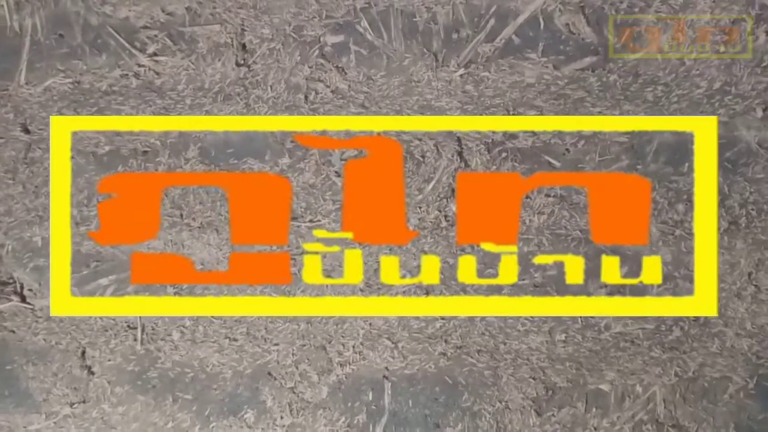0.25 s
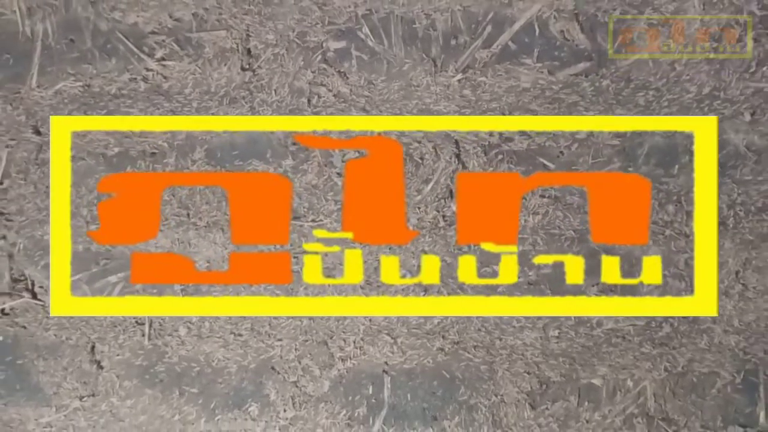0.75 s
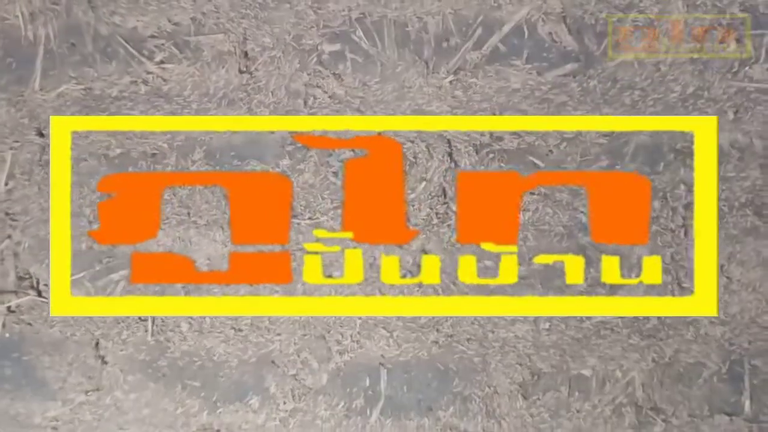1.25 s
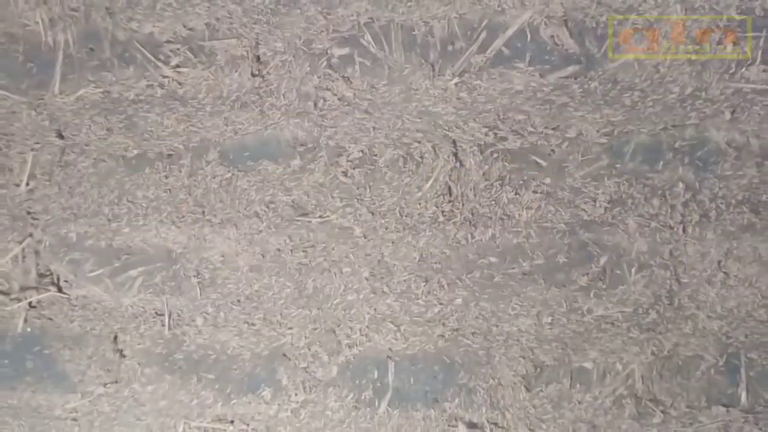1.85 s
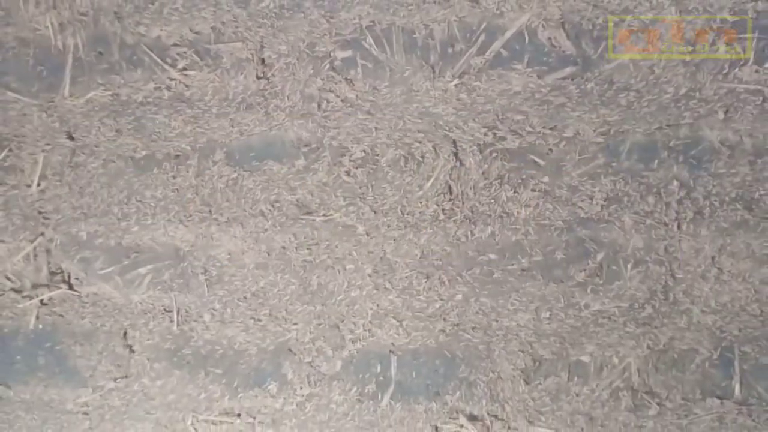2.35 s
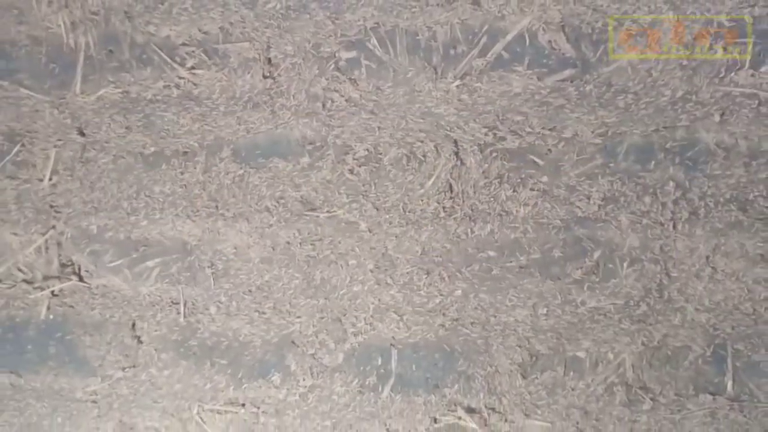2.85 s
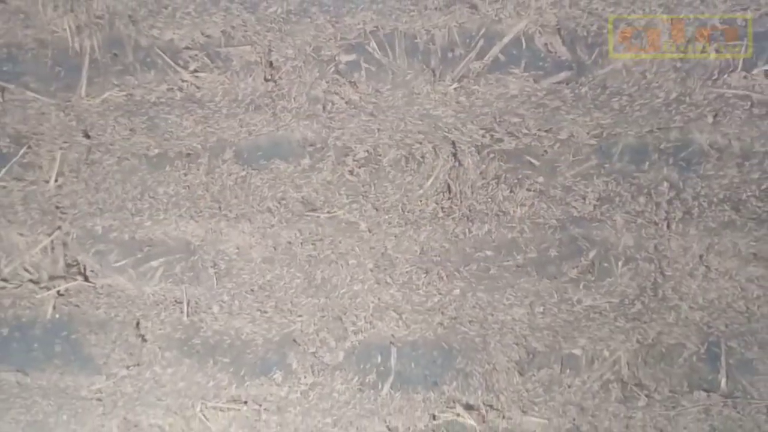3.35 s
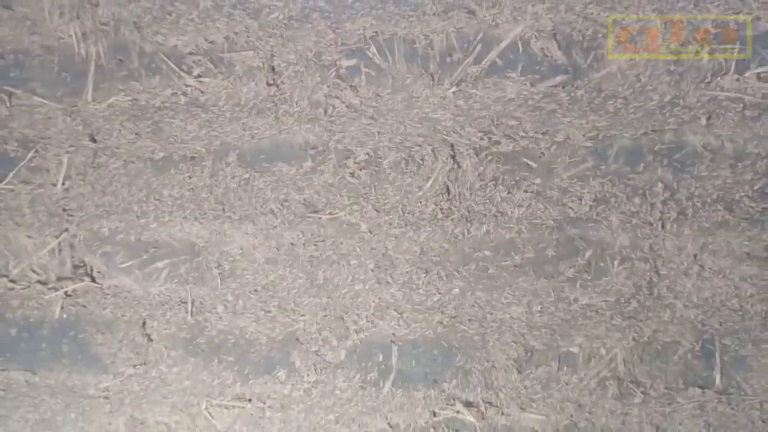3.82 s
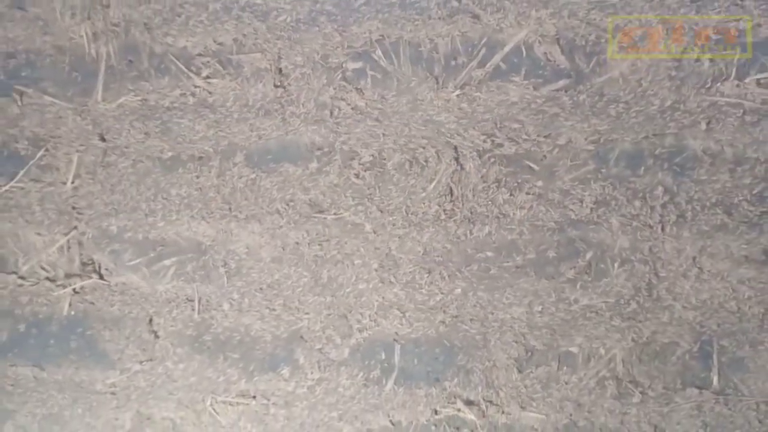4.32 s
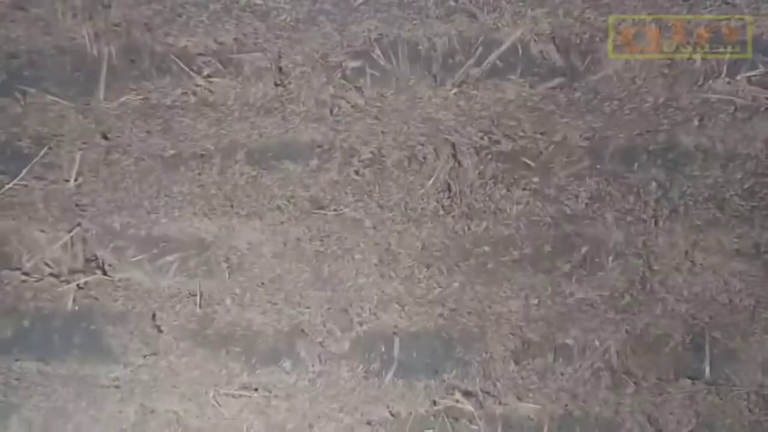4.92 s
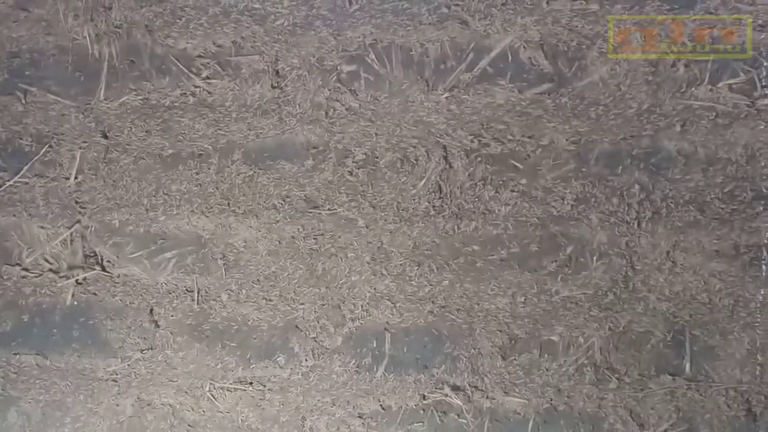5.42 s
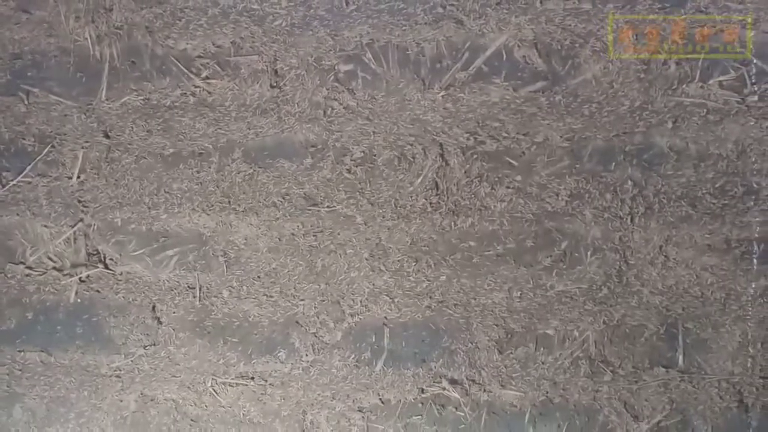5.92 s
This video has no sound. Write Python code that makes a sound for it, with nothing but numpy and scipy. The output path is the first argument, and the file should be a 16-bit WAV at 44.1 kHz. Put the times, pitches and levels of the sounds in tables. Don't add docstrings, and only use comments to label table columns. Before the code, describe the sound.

A quiet rice field with soft air noise, low far rumble and steady high insect buzz. From 0.13 s a close frog gives short, bright, nasal notes, each a tiny burst of fast pulses, about every quarter second, with a slightly longer gap before 1.03 s. A deeper neighbour overlaps or just precedes the first three, then sounds alone at 0.88 s. The near notes edge upward in pitch and end at 2.65 s. The background lifts around each loud note and ducks between. Fainter low frogs follow; from 3.4 to 5.5 s a farther frog repeats evenly, with another answering between its notes to about 6 s. Dry ten-click toad rattles recur roughly every 0.7 s. Thin high bird whistles fall at 1.9, 3.3 and 4.6 s. Crickets chirp early and again after 3.2 s, above a murmuring distant frog chorus, a faint coo near 1 s and a soft hum from 3 to 4.7 s.

```python
import sys
import numpy as np
from scipy import signal
from scipy.fft import rfft, irfft
from scipy.io import wavfile
from scipy.ndimage import uniform_filter1d

SR = 44100
rng = np.random.default_rng(int(sys.argv[2]) if len(sys.argv) > 2 else 0)


def amplitude_ratio(level_db):
    exponent = np.asarray(level_db, float) / 20
    return 10 ** exponent


def put_to_file(sound):
    columns = np.atleast_2d(sound).T
    safe = np.clip(columns, -1, 1)
    whole_steps = np.round(safe * 32767)
    wavfile.write(sys.argv[1], SR, whole_steps.astype(np.int16))


N = 272097


def ring(x, hz, width):
    return signal.lfilter(*signal.iirpeak(hz, hz / width, SR), x)


def level(x, db):
    return x * amplitude_ratio(db) / np.sqrt(np.mean(x ** 2))


def walk(rate):
    k = int(SR / rate)
    steps = rng.standard_normal(2000)[np.arange(N) // k]
    return 1.226 * uniform_filter1d(uniform_filter1d(steps, k), k)


def shaped_noise(colour):
    hz = np.fft.rfftfreq(N, 1 / SR) + 1
    f, db = np.transpose(colour)
    gain = amplitude_ratio(np.interp(np.log(hz), np.log(f), db))
    return irfft(rfft(rng.standard_normal(N)) * gain, N)


def field(x, wet_db, t60):
    t = np.arange(int(.4 * SR)) / SR
    scatter = rng.standard_normal(len(t)) * (rng.random(len(t)) < .02)
    tail = scatter * amplitude_ratio(-60 * t / t60) * (t > .008)
    echo = level(tail, wet_db) / np.sqrt(len(t))
    echo[int(.00466 * SR)] = amplitude_ratio(-10)
    return x + signal.fftconvolve(x, echo)[:N]


def voice(pulses, sac):
    f, db = np.transpose(sac)
    hz = np.fft.rfftfreq(2048, 1 / SR) + 1
    fall_db = -18 * np.clip(np.log2(hz / f[-1]), 0, None)
    cepstrum = irfft(np.log(amplitude_ratio(np.interp(np.log(hz), np.log(f), db) + fall_db)))
    cepstrum[1:1024] *= 2
    cepstrum[1025:] = 0
    response = irfft(np.exp(rfft(cepstrum)))[:1024]
    return signal.oaconvolve(pulses, response / np.linalg.norm(response))[:N]


def tune(notes, law):
    early, mid, late, lean_early, lean_late = law
    tuned = []
    for start, span, hz, db in notes:
        off = hz - mid
        tuned.append((start, span, early + lean_early * off, hz, late + lean_late * off, db))
    return tuned


SETTLE, PEAK, DROP = 0.1636, 0.53, 0.775
DULL_ABOVE_HZ, DULL_SHARE = 3700, 0.72


def frog(notes, sac, onset, swell_db, rough_db, jitter):
    pulses, soft = np.zeros((2, N + SR))
    chance = rng.standard_normal((len(notes), 2, 40))
    for (start, length, settled, hump, end, db), (late, loud) in zip(notes, chance):
        u = np.arange(int(length * SR)) / (length * SR)
        hz = np.interp(u, [0, SETTLE, PEAK, DROP, 1], [onset * settled, settled, hump, end, end])
        phase = np.cumsum(hz / SR)
        k = np.arange(int(phase[-1]) + 1)
        part = np.interp(k, phase, u)
        at = (start + part * length + jitter / settled * late[k]) * SR
        pulse_db = db + np.interp(part, [0, .12, .85, 1], swell_db) + rough_db * loud[k]
        size = amplitude_ratio(pulse_db) * np.sqrt(SR / settled)
        whole = at.astype(int)
        np.add.at(pulses, whole, size * (1 - at % 1))
        np.add.at(pulses, whole + 1, size * (at % 1))
        soft[whole] = part ** 3
    high = signal.butter(2, DULL_ABOVE_HZ, "high", fs=SR, output="sos")
    edge = signal.sosfiltfilt(high, pulses * uniform_filter1d(soft, size=3) * 3)
    return voice(pulses - DULL_SHARE * edge, sac)


def whistle(curve, rough_db, rate, wobble):
    t = np.arange(N) / SR
    s, hz, db = np.transpose(curve)
    flutter_hz = np.interp(t, s, hz) * (1 + wobble * walk(rate))
    tone = np.sin(2 * np.pi * np.cumsum(flutter_hz) / SR)
    return tone * amplitude_ratio(np.interp(t, s, db, left=-130, right=-130) + rough_db * walk(rate))


# f/Hz, level/dB (per Hz)
AIR_COLOUR = [(30, -23), (45, -9), (65, -2.5), (120, 2), (200, -8), (450, -15), (1000, -18), (3000, -17.5),
              (6000, -24.5), (9000, -24.5), (15000, -28)]
AIR_DB = -56.5


def air():
    noise = level(shaped_noise(AIR_COLOUR), AIR_DB)
    bass = signal.sosfilt(signal.butter(2, 300, fs=SR, output="sos"), noise)
    return noise + bass * (amplitude_ratio(1.2 * walk(4)) - 1)


# t/s, length/s, f/Hz (middle), droop at the ends (share of f, negative = rise), level/dB
COO = (.94, .19, 760, .13, -66)
HUM = (3, 1.7, 297.5, -0.1, -69)


def arch(start, length, top_hz, droop, db, edge_db):
    u = np.linspace(-1, 1, num=21)
    return np.transpose([start + length * (u + 1) / 2, top_hz * (1 - droop * u ** 2), db + edge_db * u ** 4])


def coo_and_hum():
    coo = whistle(arch(*COO, edge_db=-5), 1.4, 13.3, 0.0055)
    return coo + whistle(arch(*HUM, edge_db=-13), 0.64, 5.5, 0.0042)


# t/s (start), t/s (end), chirp period/s, f/Hz, level/dB
CRICKET = [
    (.018, 1.63, .1275, 9430, -66),
    (3.225, 4.12, .119, 9150, -74),
    (4.225, 4.7, .123, 9200, -71),
    (4.715, 6.17, .1165, 9400, -69.5),
]
# f/Hz, width/Hz, level/dB
TRILLS = [
    (7664, 580, -67),
    (10800, 1030, -70),
]


def insects():
    t, out = np.arange(N) / SR, 0
    for start, end, period, hz, db in CRICKET:
        beat = (t - start) / period % 1
        stroke = np.sin(np.pi * np.clip(beat / .7, 0, 1))
        chirp = np.clip(2.5 * stroke, 0, 1) * (t > start) * (t < end)
        wing = ring(ring(rng.standard_normal(N), hz, 560), hz, 560)
        out = out + chirp * level(wing, db)
    for hz, width, db in TRILLS:
        buzz = ring(ring(rng.standard_normal(N), hz, width), hz, width)
        out = out + level(buzz * amplitude_ratio(2 * walk(40) + 1.2 * walk(2.5)), db)
    return out


# t/s, lift/dB
SWELLS = [(2.1, 9), (3.38, 6), (3.68, 5), (3.93, 6.5), (4.4, 5.5), (5.45, 6), (6.05, 3)]
CHORUS_DB, CHORUS_FADE_DB_PER_S, SWELL_S = -65.5, -0.81, 0.051


def chorus():
    when, pitch, span, far = rng.random((4, 260))
    hz = 360 + 70 * pitch
    start = .01 + when * N / SR
    notes = np.transpose([start, .04 + .025 * span, hz, 1.02 * hz, .96 * hz, -9 * far])
    low, high = np.split(notes, 2)
    low = frog(low, LOW_SAC, 1.03, [4.5, 2.5, -7, -3], 0.93, 0.046)
    high = frog(high, HIGH_SAC, 1.0, [8, -8, -3.0, 8.5], 3.7, 0.052)
    t = np.arange(N) / SR
    db = CHORUS_DB + CHORUS_FADE_DB_PER_S * t
    for s, lift in SWELLS:
        db = db + lift * np.exp(-((t - s) / SWELL_S) ** 2)
    return level(field(low + amplitude_ratio(-5) * high, 1.2, 0.8), 7.3) * amplitude_ratio(db)


# t/s, hold/s, f/Hz (top), sag/Hz, level/dB
BIRD = [
    (1.858, 0.064, 7060, 233, -55.5),
    (3.29, 0.094, 6880, 322, -53),
    (4.614, .05, 6690, 333, -53),
]
BIRD_RISE_S, BIRD_SCOOP_HZ, BIRD_LEAD_DB = .04, 300, -11
BIRD_FADE_S, BIRD_DROP_DB, BIRD_FADE_DB = .13, -6, -19


def chirp_curve(start, hold, top_hz, sag_hz, db):
    peak, low = start + BIRD_RISE_S, top_hz - sag_hz
    end = peak + hold
    return [(start, top_hz - BIRD_SCOOP_HZ, db + BIRD_LEAD_DB), (peak, top_hz, db), (end, low, db),
            (end + 0.014, low + 100, db + BIRD_DROP_DB), (end + BIRD_FADE_S, low + 100, db + BIRD_FADE_DB)]


def bird():
    return field(sum(whistle(chirp_curve(*call), 3, 180, .018) for call in BIRD), -4, .35)


# t/s, level/dB
TOAD = [(0.338, -63), (1.051, -63), (2.1168, -63), (2.8201, -64), (3.459, -64.5), (4.094, -63.5),
        (4.741, -64.5), (5.5128, -65.5)]
# f/Hz, level/dB
TOAD_SAC = [(1000, -45), (1330, -2.5), (1700, -15), (2100, -9.5), (2800, -5.5), (3300, -24), (5000, -55)]
TOAD_SPACING_S = .0255


def toad():
    pulses = np.zeros(N)
    k = np.arange(10)
    for start, db in TOAD:
        shape_db = -6 * ((k - 4.2) / 5) ** 2 + 1.2 * rng.standard_normal(len(k))
        at = ((start + TOAD_SPACING_S * k) * SR).astype(int)
        pulses[at] = amplitude_ratio(db + shape_db) * np.sqrt(TOAD_SPACING_S * SR)
    return field(voice(pulses, TOAD_SAC), -5, .3)


# t/s, length/s, f/Hz (mid-note), level/dB
LOW = [(.002, 0.019, 419, -51.5), (2.615, 0.044, 404, -58), (2.758, 0.029, 413, -55.5),
       (2.862, 0.042, 386, -55), (2.96, 0.071, 386, -59), (3.255, .091, 404, -65), (3.38, 0.037, 390, -57),
       (3.55, 0.066, 411, -59.5), (3.635, 0.041, 412, -55.5), (3.87, 0.03, 414, -60),
       (4.11, .048, 412, -56.5), (4.345, 0.056, 380, -59.5), (4.58, .049, 422, -51.5),
       (4.82, .053, 415, -55), (5.078, .042, 412, -59.5), (5.335, 0.035, 411, -60),
       (5.72, 0.033, 416, -58.5), (5.97, .05, 407, -63.5)]
HIGH = [(3.415, .055, 407, -49.5), (3.692, 0.061, 403, -51.5), (3.962, .054, 392, -50),
        (4.233, 0.058, 399, -51), (4.487, 0.063, 388, -52), (4.743, 0.064, 400, -53.5),
        (4.998, 0.0565, 399, -53), (5.256, 0.053, 394, -53.5), (5.509, 0.052, 387, -52)]
STRAY = [
    (3.136, .036, 271.6, -51),
]
# f/Hz (early), f/Hz (mid), f/Hz (late), how far early follows mid, how far late follows mid
LOW_TUNE = (401, 405, 397, 0.66, 0.13)
HIGH_TUNE = (373, 392.5, 371.5, 0.9, -1)
# f/Hz, level/dB
LOW_SAC = [(1100, -32), (1550, -13), (2200, -18.5), (2600, -7), (2900, 0), (3300, -3.5), (4000, -24),
           (5000, -37), (8000, -52)]
HIGH_SAC = [(1100, -32.5), (1550, -19), (2300, -19.5), (3100, -10), (3510, 0.5), (3780, -11.5), (4400, -22),
            (5200, -29.5), (8000, -54)]
# level/dB at its start, 12 %, 85 % and end
HIGH_SWELL_DB = [3.5, 1.2, 1.8, -3]


def far_frogs():
    high_notes = tune(STRAY, NEIGHBOUR_TUNE) + tune(HIGH, HIGH_TUNE)
    high = frog(high_notes, HIGH_SAC, 1.06, HIGH_SWELL_DB, 1, .005)
    low = frog(tune(LOW, LOW_TUNE), LOW_SAC, .99, [-3, 0, 0, -4], 1.2, .007)
    return field(high + low, -14, .4)


# t/s, length/s, f/Hz (mid-note), level/dB
NEIGHBOUR = [
    (0.136, 0.055, 318.5, -39.5),
    (0.3848, 0.07, 318.7, -42),
    (0.6326, .054, 339, -40.5),
    (0.8761, .061, 366.6, -42.5),
]
# f/Hz (early), f/Hz (mid), f/Hz (late), how far early follows mid, how far late follows mid
NEIGHBOUR_TUNE = (358, 335, 310, 0.604, 0.745)
# f/Hz, level/dB
NEIGHBOUR_SAC = [(1000, -40), (1400, -18.5), (1850, -10), (2150, -20), (2600, -8), (2950, 0.5),
                 (3300, -2.5), (3800, -7), (4150, -14), (4500, -18.5), (5200, -21.5), (8000, -33)]


def neighbour_frog():
    return frog(tune(NEIGHBOUR, NEIGHBOUR_TUNE), NEIGHBOUR_SAC, 1.27, [0, -1.5, 1.5, -7], .8, .003)


# t/s, length/s, f/Hz (mid-note), level/dB
NEAR = [(0.1328, 0.048, 425.4, -33), (0.3999, 0.043, 426, -33), (0.6573, 0.046, 426.6, -32.5),
        (1.033, .046, 430.5, -34), (1.287, 0.048, 434.3, -35.5), (1.5863, 0.046, 426, -34),
        (1.852, 0.046, 429.4, -34), (2.117, 0.043, 440, -35), (2.3771, .044, 456, -35),
        (2.6513, 0.045, 461, -36.5)]
# f/Hz (early), f/Hz (mid), f/Hz (late), how far early follows mid, how far late follows mid
NEAR_TUNE = (420.5, 426.5, 413.5, 0.9, -0.2)
# f/Hz, level/dB
NEAR_SAC = [(950, -48.5), (1200, -33.5), (1340, -12), (1750, -20), (2250, -20), (2550, -9), (2740, -2.5),
            (2915, 5.5), (3040, -6), (3250, -9.5), (4200, -22.5), (4800, -29), (7000, -37.5),
            (10300, -39.5)]
# level/dB at its start, 12 %, 85 % and end
NEAR_SWELL_DB = [0.5, 0, 1.5, 4.5]


def near_frog():
    return frog(tune(NEAR, NEAR_TUNE), NEAR_SAC, 1.1, NEAR_SWELL_DB, .6, .004)


CLOSE_WET_DB, CLOSE_T60_S = -20, 0.39


def scene():
    background = air() + coo_and_hum() + insects() + chorus()
    middle = bird() + toad() + far_frogs()
    close = field(neighbour_frog() + near_frog(), CLOSE_WET_DB, CLOSE_T60_S)
    return (background + middle + close)[None]


def low_pass(x):
    return signal.sosfilt(signal.butter(12, 15610, fs=SR, output="sos"), x)


GATE_DB, GATE_LEAD_S, GATE_HOLD_S, GATE_FIRST_S = -8, 0.0035, 0.0871, 0.013
TOP_HZ = 15450


def record(dry):
    t = np.arange(N) / SR
    opened = t < GATE_FIRST_S
    for start, span, *_ in NEAR + NEIGHBOUR[-1:]:
        opened = opened | (t >= start - GATE_LEAD_S) & (t < start + span + GATE_HOLD_S)
    for start, span, *_ in NEIGHBOUR:
        opened = opened | (t >= start - GATE_LEAD_S) & (t < start + span)
    gain = uniform_filter1d(amplitude_ratio(GATE_DB * (1 - opened)), size=90)
    top = signal.ellip(8, .2, 70, TOP_HZ, fs=SR, output="sos")
    return low_pass(signal.sosfilt(top, dry * gain))


dry = scene()
out = record(dry)
put_to_file(out)
```